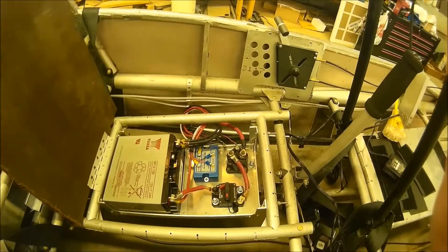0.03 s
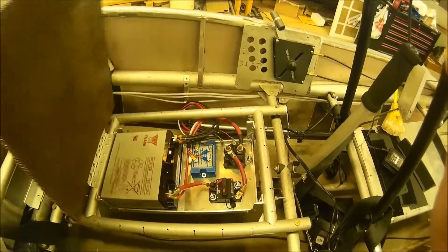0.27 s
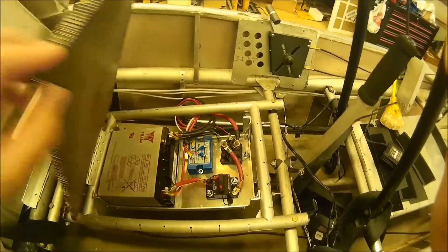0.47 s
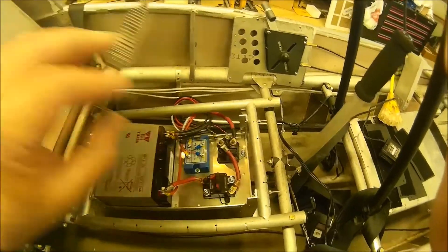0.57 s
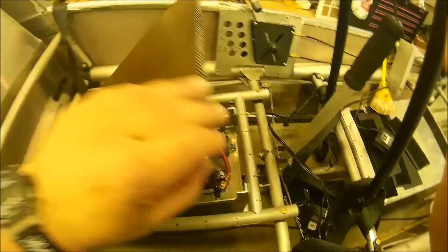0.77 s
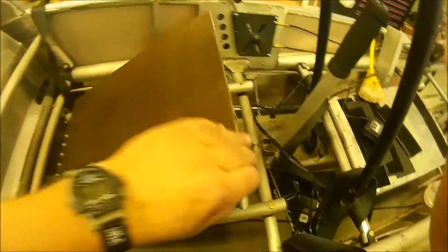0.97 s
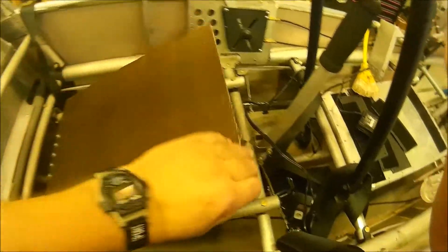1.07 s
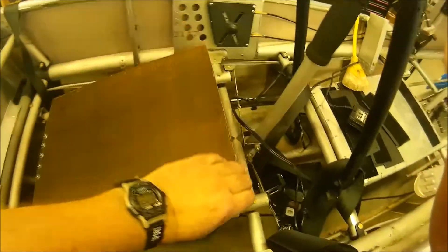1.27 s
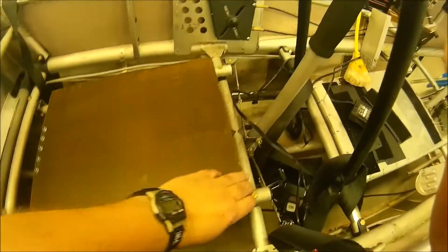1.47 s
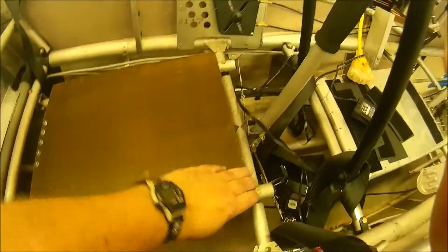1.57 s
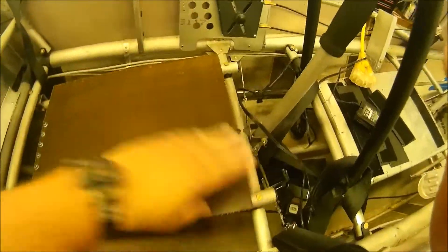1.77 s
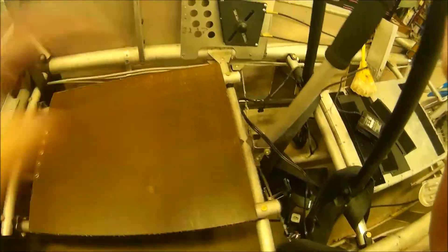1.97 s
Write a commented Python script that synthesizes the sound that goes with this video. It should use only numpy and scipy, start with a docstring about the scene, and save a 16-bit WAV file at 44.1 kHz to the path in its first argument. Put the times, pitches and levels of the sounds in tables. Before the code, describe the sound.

A hinged panel drops onto a metal tube frame with one sharp, rattling knock in a workshop

```python
"""A quiet workshop: filtered noise and two steady tones make the air and a machine's hum.
At first a hinge ticks (noise bursts with ringing tones), a far cricket trills (a pulsing rasp) and fingers
brush an edge (noise in narrow bands). At 1.5 s a hinged panel, lowered by hand, lands on a metal tube frame:
a rattling knock of cracks, ringing tones, a thud and clatter. The palm slides off across it as rough noise
and fingertips trail away. The camera's gain control lifts everything for a while after the knock."""
import sys
import numpy as np
from scipy import signal
from scipy.fft import rfft, irfft, next_fast_len
from scipy.io import wavfile
from scipy.ndimage import uniform_filter1d, map_coordinates

SR = 44100
rng = np.random.default_rng(int(sys.argv[2]) if len(sys.argv) > 2 else 0)


def gain_from_decibels(decibels):
    """Convert decibel values to linear amplitude factors."""
    exponent = np.asarray(decibels, float) / 20
    return 10 ** exponent


def materialize(psi):
    """Save the field psi as 16-bit PCM at rate SR to the path in sys.argv[1].

    A 1-D psi becomes a single channel; in a 2-D psi each row is a channel.
    """
    bounded = np.clip(np.atleast_2d(psi).T, -1, 1)
    quanta = np.round(bounded * 32767).astype(np.int16)
    wavfile.write(sys.argv[1], SR, quanta)


N = 89434  # length [samples]

# the landing edge touches down in quick succession: (time [s], relative level [dB])
CONTACTS = [(1.499, -12), (1.5002, -14), (1.5019, -7), (1.5048, -19), (1.5085, -14), (1.5119, -31),
            (1.5154, -52.5), (1.522, -63)]
# tones of panel and frame: (frequency [Hz], level when struck [dB], time to fall 60 dB [s],
# level when rubbed, before the filter is squared [dB])
PANEL = [(295.36, -1.5, 0.11146, -14.5), (325.54, -13, 0.2233, -12.5), (534.42, -3.5, 0.2604, -17.5),
         (577.35, -6.5, 0.61614, -1), (592.99, -2, 0.2586, -3), (668.06, -1.5, 0.08785, -12.5),
         (1057, -9, 0.15, 2.5), (1067.1, -8.5, 0.08141, -6), (1393.8, -4.5, 0.06752, -6),
         (1435.4, 1, 0.3708, 0), (1733.7, -8, 0.16436, -3.5), (1916.9, -8, 0.0947, -7),
         (2550.4, -2, 0.06233, -8), (2903.1, -11.5, 0.0577, -10.5), (3253, -27, 0.067, -27)]
# colour of the blow's clatter and cracks: (frequency [Hz], relative level [dB])
CLATTER_COLOUR = [(24, -35), (40, -17), (90, -2.5), (180, -13.5), (300, -3), (440, -12.5), (590, -0.5),
                  (800, -10.5), (1110, -3), (1430, -5), (2000, -10), (3000, -12), (4300, -22.5),
                  (5810, -32.5), (9000, -36.5), (12300, -44), (15800, -50.5)]
# how fast the clatter dies: (frequency [Hz], time to fall 60 dB [s])
CLATTER_DECAY = [(60, 0.08703), (300, 0.17664), (1000, 0.16706), (3000, 0.0741), (8000, 0.09007),
                 (14000, 0.091)]
# palm sliding on the panel: (time [s], level [dB])
SLIDE = [(1.505, -63.5), (1.53, -40.5), (1.57, -45), (1.62, -41), (1.68, -41), (1.74, -45), (1.82, -49),
         (1.88, -51.5), (1.93, -57), (2.03, -50.5)]
# colour of the sliding noise: (frequency [Hz], relative level [dB])
SLIDE_COLOUR = [(18, -42.5), (30, -7), (64, -8.5), (262, -17.5), (369, -7), (453, -16), (582, -3),
                (624, -12), (801, -7.5), (1450, -5), (1590, -7.5), (1820, -6), (3450, -25.5), (4050, -22.5),
                (7000, -47.5), (9100, -68), (15400, -120)]
# a short swish of skin: (time [s], level [dB])
SKIN = [(1.63, -87.5), (1.665, -73), (1.685, -66), (1.705, -78.5), (1.74, -79), (1.85, -100)]
# colour of the swish: (frequency [Hz], relative level [dB])
SKIN_COLOUR = [(3240, -31), (5500, -15), (6620, -5.5), (7730, 6.5), (10000, 0), (12500, 6), (15800, -23)]
# fingers brushing the edge: (time [s], level [dB])
BRUSH = [(0, -77.5), (.1, -84), (.5, -78), (.56, -74), (.73, -72.5), (.78, -81), (1.02, -76), (1.09, -71.5),
         (1.15, -65.5), (1.28, -70), (1.42, -76), (1.45, -100)]
# bands of the brushing, before the filter is squared: (frequency [Hz], width [Hz], relative level [dB])
BRUSH_BANDS = [(1596.4, 451, 4.5), (2847.7, 150, -1)]
# fingertips trailing off the panel: (time [s], level [dB])
LEAVE = [(1.9, -78.5), (1.955, -55.5), (2.005, -52.5), (2.03, -59.5)]
# bands of the trailing off, before the filter is squared: (frequency [Hz], width [Hz], relative level [dB])
LEAVE_BANDS = [(1588.5, 421.7, 1), (4371, 556, -9.5)]
# slips of the hinge: (time [s], relative strength [dB], ring level added to the strength [dB])
TICKS = [(0.2056, -53, -7.5), (0.2453, -53, -4), (0.2861, -53, -3), (0.3272, -52.5, -2),
         (0.3615, -52.5, -4), (0.412, -52.5, -4), (0.7182, -57, -31.5), (0.7994, -57, -6.5),
         (0.853, -55, -17), (0.9074, -53, -16.5), (0.9329, -56, -23.5), (1.125, -51, -28)]
# tones of the hinge leaf: (frequency [Hz], relative level [dB], time to fall 60 dB [s])
HINGE = [(1076.6, -8.5, 0.11646), (1379.9, -5, 0.06083)]
# colour of the hinge's snap: (frequency [Hz], relative level [dB])
SNAP_COLOUR = [(500, -24), (1000, -7), (2000, -7), (3200, -6.5), (4200, -19.5), (7000, -34)]
# a tiny bright click: (time [s], relative level [dB])
CLICKS = [(1.5638, -51)]
# colour of the click: (frequency [Hz], relative level [dB])
CLICK_COLOUR = [(7000, -40), (10000, 6), (15000, -2.5), (16000, 8)]
# cricket trills: (start [s], swell [s], time to fade by 10 dB [s], level [dB])
TRILLS = [(.165, 0.16, 0.1329, -67), (1.2, 0.14, 0.2357, -66)]
# colour of air and microphone hiss: (frequency [Hz], relative level [dB])
ROOM_COLOUR = [(12, -33), (20, 2.5), (119, -1.5), (208, -2), (364, -7.5), (418, -6), (553, -8), (772, -13),
               (993, -13), (2050, -19), (14400, -26), (15700, -32.5)]
# hum of the machine: (frequency [Hz], average level [dB])
HUM = [(360.7, -74), (9500, -89.5)]
# how fast the room's answer dies: (frequency [Hz], time to fall 60 dB [s])
WALLS_DECAY = [(100, 0.4966), (1000, 0.6916), (10000, 0.177)]

CONTACT_S = 0.00010955  # softness of every strike's start
# T60 is the time to fall by 60 dB
CLATTER_DB, CRACK_DB, CRACK_T60_S = -20.5, -2.5, 0.013396
RING_DB, RING_SCATTER_DB = -22, 3.5
THUD_DB, THUD_HZ, THUD_T60_S = -32.5, 82.92, 0.0894
SLIDE_BODY_DB, SLIDE_WIDEN, SLIDE_ROUGH_DB = -2.5, 1.925, 1.2  # widen: times the struck tones' width
SNAP_DB, SNAP_T60_S = -9.5, 0.03355
CLICK_DB, CLICK_T60_S = 1.5, 0.00639
CRICKET_HZ, CRICKET_WIDTH_HZ, GLIDE_HZ = 5051.9, 270, 200
PULSES_PER_S, PULSE_JITTER, PULSE_DEPTH = 130, 0.25, 0.4
CRICKET_STEADY = 0.7  # share of pure tone added to the rasp
WALLS_DB, ROOM_DB = -16, -65.5
LOW_CUT_HZ, TOP_HZ = 14.64, 15830
GAIN_AT_DB, GAIN_LIFT_DB = -27, 8.5
GAIN_RISE_S, GAIN_HOLD_S, GAIN_FALL_S = 0.19732, 0.44766, 0.04004  # the hold includes the fall


def unit(x):
    """Scales a sound to an average (rms) level of 1."""
    return x / np.sqrt(np.mean(x ** 2) + 1e-20)


def along(points, hz):
    """Reads (frequency, value) points at any frequency, on a log axis."""
    f, v = np.transpose(points)
    return np.interp(np.log(hz + 1), np.log(f + 1), v)


def level(rows):
    """Turns (time, dB) rows into a gain per sample, nearly silent before the first."""
    s, db = np.transpose(rows)
    return gain_from_decibels(np.interp(np.arange(N) / SR, s, db, left=-120))


def wobble(rate):
    """A smooth random curve with `rate` random points a second."""
    points = rng.standard_normal(int(N * rate / SR) + 4)
    return map_coordinates(points, [np.arange(N) * rate / SR])


def filtered(x, response):
    """Multiplies the spectrum of x by a function of frequency."""
    m = next_fast_len(len(x) + SR // 2)
    spectrum = rfft(x, m) * response(np.fft.rfftfreq(m, 1 / SR))
    return irfft(spectrum, m)[:len(x)]


def peaks(rows):
    """A filter of (frequency, width, dB) resonances, added with alternating signs."""
    def resonance(f, centre, width, db):
        return gain_from_decibels(db) * 1j * f * width / (centre * centre - f * f + 1j * f * width)
    return lambda f: sum((-1) ** k * resonance(f, *row) for k, row in enumerate(rows))


def squared(response):
    """Doubles a filter's effect in dB and keeps its phase."""
    return lambda f: response(f) * np.abs(response(f))


def coloured(spectrum):
    """Noise with the given colour and an average level of 1."""
    return unit(filtered(rng.standard_normal(N), lambda hz: gain_from_decibels(along(spectrum, hz))))


def dying(t60s, spectrum):
    """Half a second of noise in ten overlapping bands, each dying at its own speed."""
    t, mids = np.arange(SR // 2) / SR, np.geomspace(40, 16000, num=10)
    out = np.zeros(len(t))
    for k, hz in enumerate(mids):
        share = list(zip(mids, np.arange(len(mids)) == k))  # 1 at this band, 0 at the others
        noise = rng.standard_normal(len(t))
        band = filtered(noise, lambda f: along(share, f) * gain_from_decibels(along(spectrum, f)))
        out += band * gain_from_decibels(-60 * t / along(t60s, hz))
    return out


def strikes(events, modes, scatter_db):
    """Every event sets the same tones ringing anew, at slightly random levels."""
    out, t = np.zeros(N + SR), np.arange(SR // 2) / SR
    for s, db in events:
        ring = np.zeros(len(t))
        for hz, mode_db, t60 in modes:
            fade = gain_from_decibels(mode_db + rng.normal(0, scatter_db) - 60 * t / t60)
            ring += fade * np.sin(2 * np.pi * hz * t)
        out[round(s * SR):][:len(t)] += gain_from_decibels(db) * ring * (1 - np.exp(-t / CONTACT_S))
    return out[:N]


def snaps(events, spectrum, t60_s):
    """A short soft-edged burst of noise at every event."""
    out, t = np.zeros(N + SR), np.arange(SR // 10) / SR
    soft_edge = 1 - np.exp(-(t / CONTACT_S) ** 2)
    for s, db in events:
        burst = coloured(spectrum)[:len(t)]
        out[round(s * SR):][:len(t)] += gain_from_decibels(db - 60 * t / t60_s) * soft_edge * burst
    return out[:N]


def knock():
    """Each contact cracks and rings the panel; the frame thuds and clatters from the first touch."""
    first = CONTACTS[0][0]
    clatter = dying(CLATTER_DECAY, CLATTER_COLOUR)
    clatter = clatter / np.std(clatter[:SR // 100])
    rise = 1 - np.exp(-np.arange(len(clatter)) / SR / 0.002185)
    frame = np.pad(rise * clatter, (round(first * SR), N))[:N]
    thud = strikes([(first, THUD_DB)], [(THUD_HZ, 0, THUD_T60_S)], 1)
    cracks = snaps(CONTACTS, CLATTER_COLOUR, CRACK_T60_S)
    ring = strikes(CONTACTS, [row[:3] for row in PANEL], RING_SCATTER_DB)
    return thud + gain_from_decibels(CLATTER_DB) * frame + gain_from_decibels(CRACK_DB) * cracks + gain_from_decibels(RING_DB) * ring


def palm():
    """Rough friction drives the panel's tones and its broad body; the skin hisses on top."""
    rough = gain_from_decibels(SLIDE_ROUGH_DB * wobble(60) + 0.6974 * wobble(300))
    # a tone that dies sooner fills a wider band
    modes = peaks([(hz, SLIDE_WIDEN * np.log(1000) / np.pi / t60, db) for hz, _, t60, db in PANEL])
    body = unit(filtered(rough * rng.standard_normal(N), squared(modes)))
    slide = unit(rough * coloured(SLIDE_COLOUR) + gain_from_decibels(SLIDE_BODY_DB) * body)
    swish = gain_from_decibels(2.122 * wobble(250)) * coloured(SKIN_COLOUR)
    return level(SLIDE) * slide + level(SKIN) * swish


def fingers():
    """Uneven friction noise in narrow bands, before the landing and as the hand leaves."""
    out = np.zeros(N)
    for stroke, bands in (BRUSH, BRUSH_BANDS), (LEAVE, LEAVE_BANDS):
        friction = gain_from_decibels(1.92 * wobble(50.063)) * rng.standard_normal(N)
        out += level(stroke) * unit(filtered(friction, squared(peaks(bands))))
    return out


def hinge():
    """Each slip snaps and sets the hinge leaf ringing."""
    rings = strikes([(s, db + ring) for s, db, ring in TICKS], HINGE, 0.92)
    return gain_from_decibels(SNAP_DB) * snaps([row[:2] for row in TICKS], SNAP_COLOUR, SNAP_T60_S) + rings


def bright_click():
    """A tiny burst of treble noise that dies within milliseconds."""
    return gain_from_decibels(CLICK_DB) * snaps(CLICKS, CLICK_COLOUR, CLICK_T60_S)


def cricket():
    """A narrow rasp, pulsing unevenly, whose pitch rises as each trill swells."""
    t = np.arange(N) / SR
    cycle = np.cumsum(PULSES_PER_S * (1 + PULSE_JITTER * wobble(32))) / SR
    pulses = 1 + PULSE_DEPTH * np.cos(2 * np.pi * cycle)

    def slow_noise():
        return unit(filtered(rng.standard_normal(N), lambda f: np.exp(-(f / CRICKET_WIDTH_HZ) ** 4)))

    out = np.zeros(N)
    for s, swell, fade, db in TRILLS:
        up = np.clip((t - s) / swell, 0, 1)
        phase = 2 * np.pi * np.cumsum(CRICKET_HZ - GLIDE_HZ * (1 - up)) / SR
        # slow noise on a tone spreads it into a narrow band
        rasp = (slow_noise() + CRICKET_STEADY) * np.sin(phase) + slow_noise() * np.cos(phase)
        shape = up * gain_from_decibels(-10 * (np.clip(t - s - swell, 0, None) / fade) ** 0.8095)
        out += gain_from_decibels(db) * shape * unit(pulses * rasp)
    return out


def workshop(x):
    """The walls answer, 400 samples late, with a dying tail of noise."""
    tail = dying(WALLS_DECAY, [(100, 0)])
    return signal.fftconvolve(np.pad(x, (400, 0)), tail / np.linalg.norm(tail))[:N]


def room_tone():
    """Noise for workshop air and microphone hiss, with slightly wavering hum tones."""
    t = np.arange(N) / SR
    hum = np.zeros(N)
    for hz, db in HUM:
        loudness = gain_from_decibels(db + 1.512 * wobble(14.859)) * np.sqrt(2)
        hum += loudness * np.sin(2 * np.pi * hz * t + 0.4872 * wobble(11.199))
    return gain_from_decibels(ROOM_DB + 0.2667 * wobble(8.08)) * coloured(ROOM_COLOUR) + hum


def gain_control(x):
    """A loud sound raises the gain slowly; it holds a while, then drops back."""
    t = np.arange(N) / SR
    loud = uniform_filter1d(x ** 2, size=SR // 100) > gain_from_decibels(2 * GAIN_AT_DB)
    since_loud = t - np.maximum.accumulate(np.where(loud, t, -10))
    held = np.clip((GAIN_HOLD_S - since_loud) / GAIN_FALL_S, 0, 1)
    creep = np.clip(np.cumsum(held) / (GAIN_RISE_S * SR), 0, 1)
    return x * gain_from_decibels(GAIN_LIFT_DB * creep * held)


def scene():
    """Adds all sources at the microphone; knock, hinge and click also echo from the walls."""
    near = knock() + hinge() + bright_click()
    echo = gain_from_decibels(WALLS_DB) * workshop(near)
    return (near + echo + palm() + fingers() + cricket() + room_tone())[None]


def low_pass(x):
    """Removes everything above the highest recorded frequency."""
    return signal.sosfilt(signal.butter(12, 16250, fs=SR, output="sos"), x)


def record(dry):
    """The microphone loses the deepest bass and the top treble; then the gain control acts."""
    def microphone(hz):
        return (1j * hz / (LOW_CUT_HZ + 1j * hz)) ** 2 * (hz < TOP_HZ)
    mix = gain_control(filtered(dry[0], microphone))[None]
    return low_pass(mix)


dry = scene()
out = record(dry)
materialize(out)
```